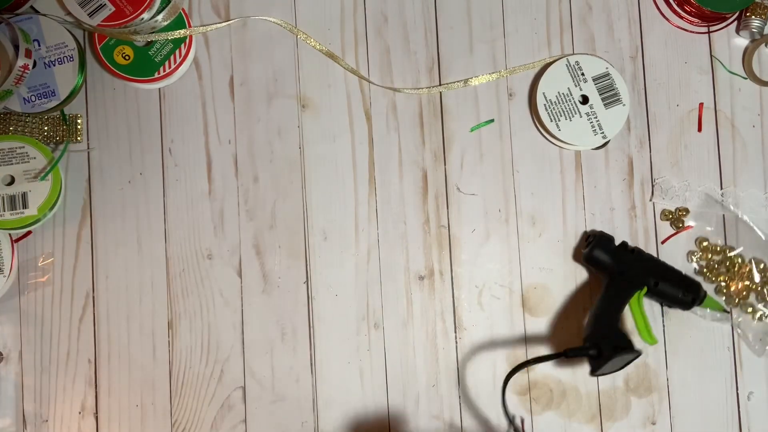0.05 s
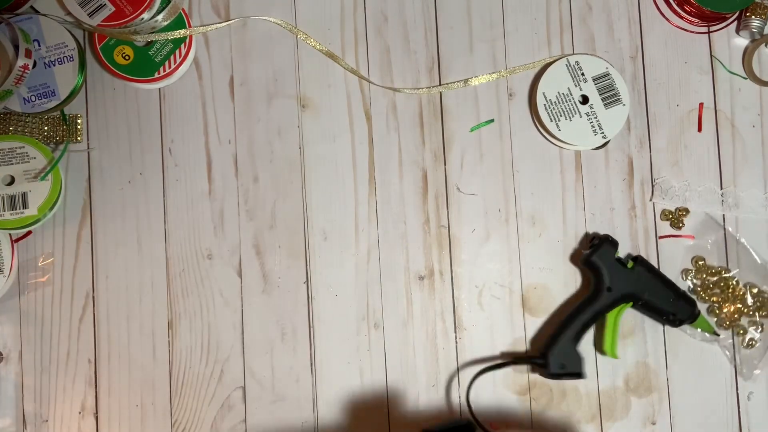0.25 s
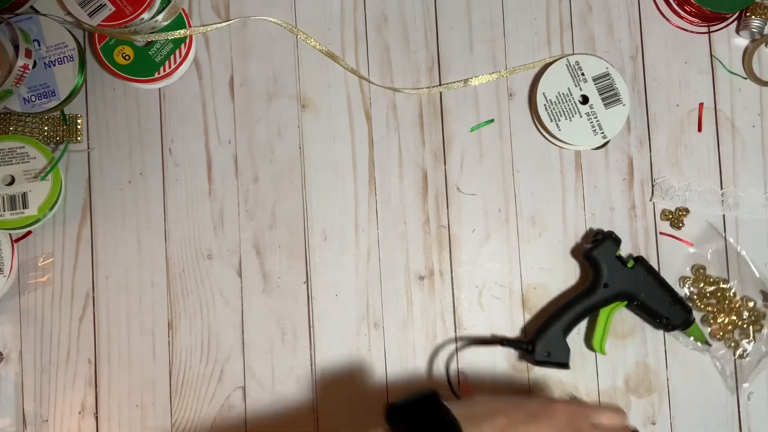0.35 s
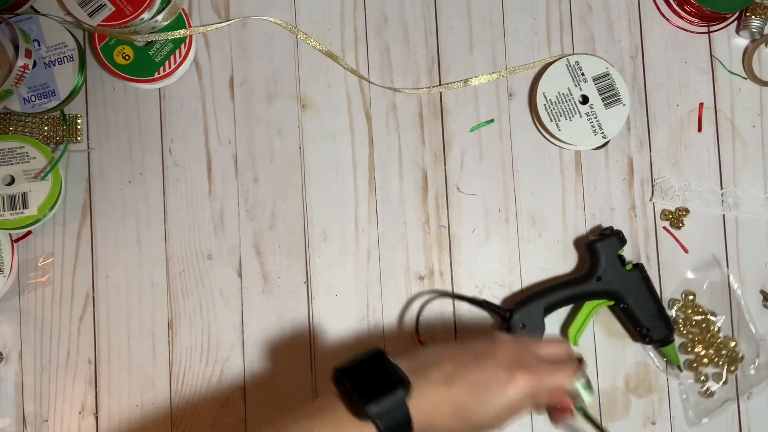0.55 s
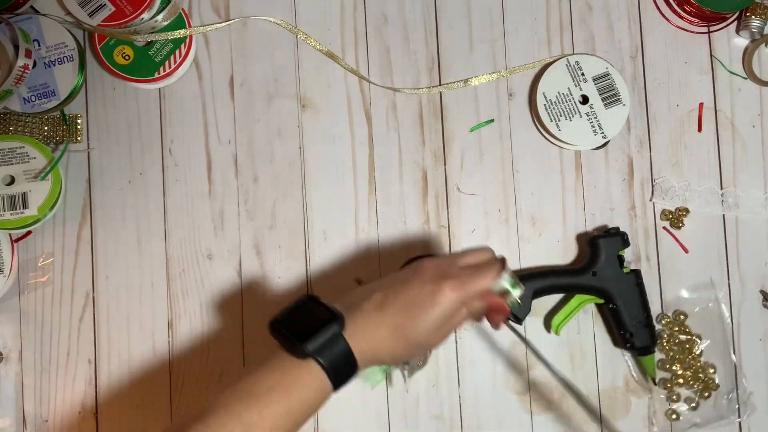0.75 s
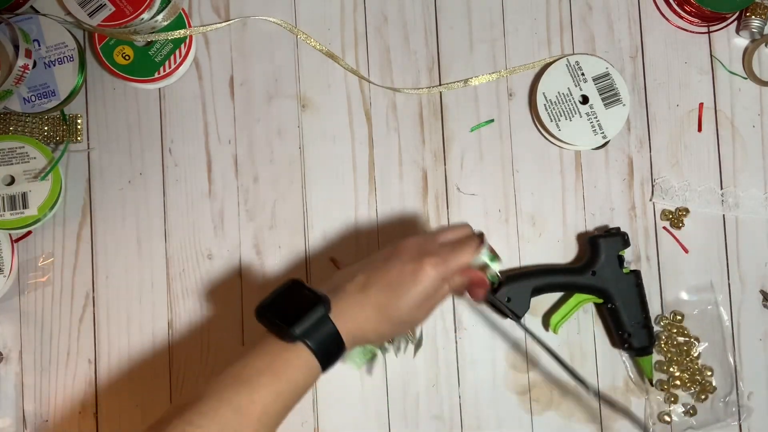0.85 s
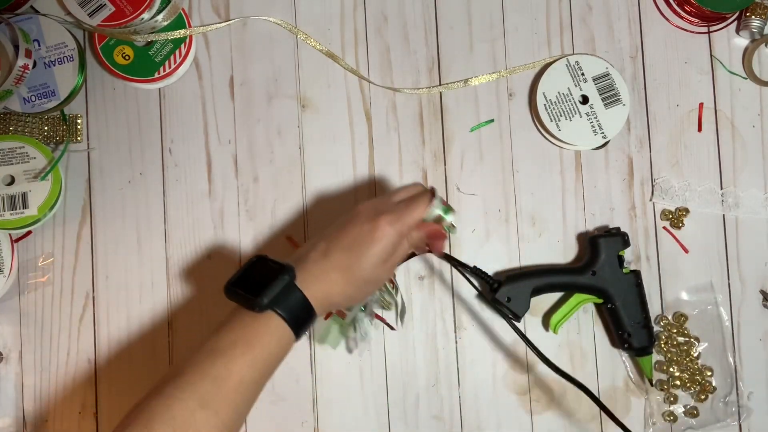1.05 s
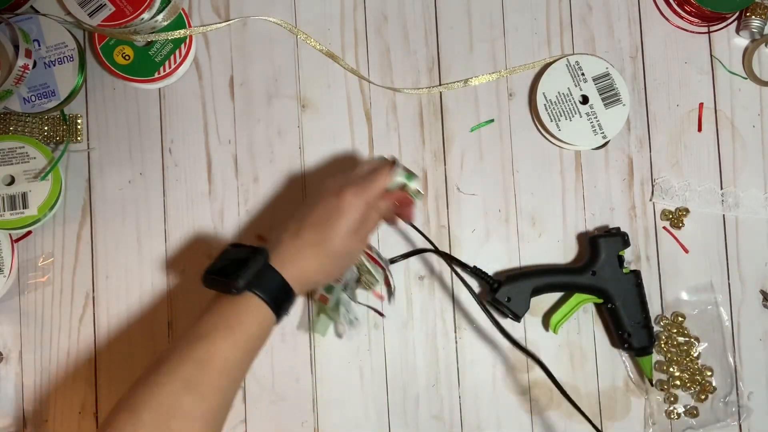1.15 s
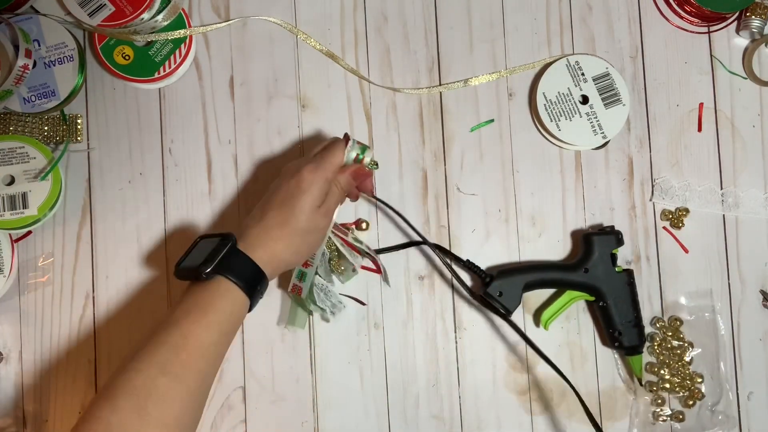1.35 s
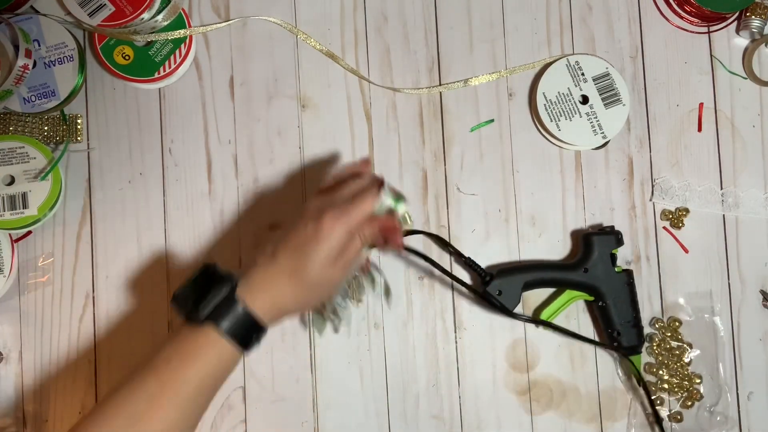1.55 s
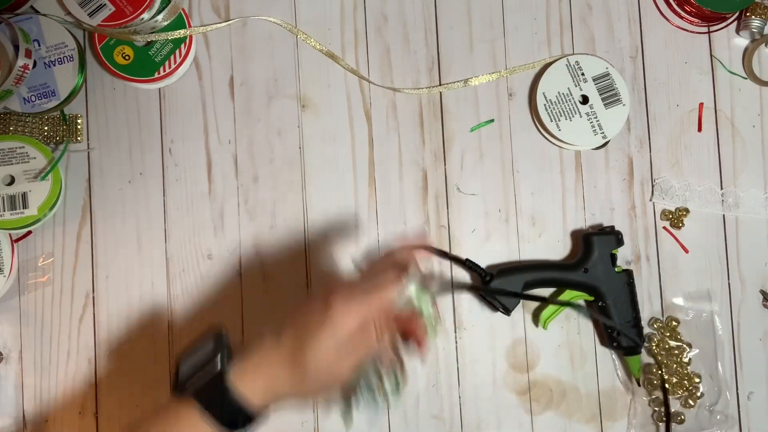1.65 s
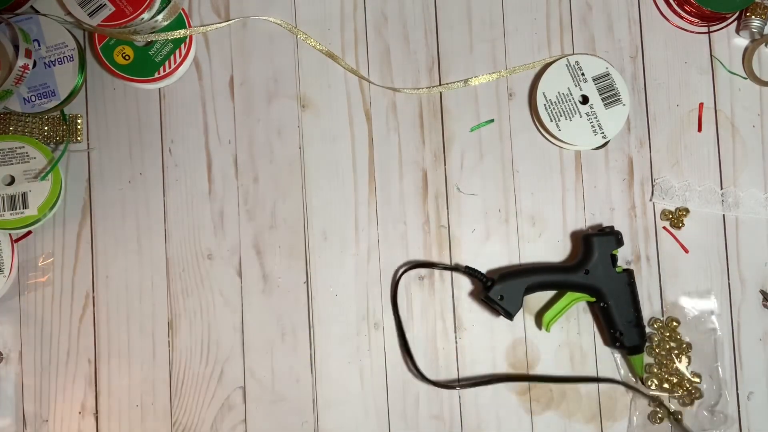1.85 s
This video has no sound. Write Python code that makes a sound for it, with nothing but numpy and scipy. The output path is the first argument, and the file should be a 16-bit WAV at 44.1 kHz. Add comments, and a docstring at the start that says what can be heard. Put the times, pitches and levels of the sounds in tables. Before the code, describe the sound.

Hollow plastic glue gun clacks down on a wood table, followed by cord clicks and faint jingling

```python
"""Glue gun and bell bag on a tabletop

A small plastic glue gun is set down on a wooden tabletop, slides and settles: noise bursts and clicks drive
its resonances. Its cord then flicks and drags over the table and against a bag of tiny metal bells: filtered
bursts, uneven grains and faint ringing modes. The table booms softly at each push, as a decaying low sine,
over a mains hum, a low rumble and room hiss. A pair of close microphone ports hears it."""
import sys
import numpy as np
from scipy import signal
from scipy.fft import rfft, irfft, next_fast_len
from scipy.io import wavfile

SR = 44100
rng = np.random.default_rng(int(sys.argv[2]) if len(sys.argv) > 2 else 0)


def wrap_up_sound(samples):
    """Save the sound to the file named by the first command line argument, as 16-bit audio."""
    columns = np.atleast_2d(samples).T
    # keep every value between -1 and 1, then stretch to whole-number steps
    tamed = np.clip(columns, -1, 1)
    steps = np.round(tamed * 32767).astype(np.int16)
    wavfile.write(sys.argv[1], SR, steps)


N = 83790


def from_db(db):
    """Amplitude gain of a level in dB."""
    return 10 ** (np.asarray(db) / 20)


def rms_one(x):
    """Scale to rms 1 over all channels together."""
    return x / np.sqrt(np.mean(x ** 2) + 1e-20)


def colour(x, points):
    """Equalise along (f/Hz, gain/dB) points, joined by straight lines over log frequency."""
    size = next_fast_len(N + 4096)
    hz = np.maximum(np.arange(size // 2 + 1) * SR / size, 1)
    points_hz, points_db = np.array(points).T
    gain = from_db(np.interp(np.log(hz), np.log(points_hz), points_db))
    return irfft(rfft(x, size) * gain, size)[..., :N]


def peak(x, hz, width_hz):
    """Two-pole resonance with about unit gain on top."""
    r = np.exp(-np.pi * width_hz / SR)
    return signal.lfilter([(1 - r * r) / 2, 0, (r * r - 1) / 2], [1, -2 * r * np.cos(2 * np.pi * hz / SR), r * r], x)


def strike(times, levels_db, modes, spread_db):
    """Mid and side ringing: every blow excites every mode with a random strength and a random side sign."""
    out = np.zeros((2, N))
    at = np.clip(np.array(times) * SR, 0, N - 1).astype(int)
    draws = rng.standard_normal((len(at), len(modes), 3))
    for k, (hz, db, t60) in enumerate(modes):
        clicks = np.full((2, N), 1e-18)   # tiny floor instead of exact silence
        clicks[:, at] = from_db(levels_db + db + spread_db * draws[:, k, :2].T)
        clicks[1, at] *= np.sign(draws[:, k, 2])
        r, w = from_db(-60 / (t60 * SR)), 2 * np.pi * hz / SR
        out += signal.lfilter([0, np.sin(w)], [1, -2 * r * np.cos(w), r * r], clicks)
    return out


TAP_RISE_S, SNAP_DB, SNAP_T60_S = .0008, 5, .01   # the snap level is against the rattle


def burst(t60):
    """Mid and side noise, a quarter second long: a sharp snap over a dying rattle."""
    t = np.arange(SR // 4) / SR
    noise = rng.standard_normal((2, SR // 4))
    rattle = from_db(-60 * t / t60)
    snap = from_db(SNAP_DB - 60 * t / SNAP_T60_S)
    return noise * (rattle + snap) * (1 - np.exp(-t / TAP_RISE_S))


def add(out, s, x):
    """Mix x into out from time s."""
    i = int(s * SR)
    out[:, i:i + x.shape[1]] += x[:, :N - i]


# tone of the room hiss: [f/Hz, gain/dB]
HISS_COLOUR = [(20, -19.5), (60, -5.5), (130, -14), (200, -26.5), (500, -44.5), (2500, -44), (5000, -39.5),
               (16000, -54.5)]
HISS_DB = -51
HUM_HZ, HUM_DB = 120.7, -49.5
RUMBLE_HZ, RUMBLE_WIDTH_HZ, RUMBLE_DB = 61.6, 4.7, -61


def background():
    """Broad room hiss, a narrow band of low noise as rumble, and mains hum as a steady sine."""
    hiss = from_db(HISS_DB) * rms_one(colour(rng.standard_normal((2, N)), HISS_COLOUR))
    rumble = rng.standard_normal((2, N + SR))
    for _ in range(2):
        rumble = peak(rumble, RUMBLE_HZ, RUMBLE_WIDTH_HZ)
    rumble = rumble[:, SR:]   # skip the build-up of the resonance
    hum = np.sqrt(2) * np.sin(2 * np.pi * HUM_HZ * np.arange(N) / SR)
    return hiss + from_db(RUMBLE_DB) * rms_one(rumble) + from_db(HUM_DB) * hum


# handling of cord and bag, also followed by the jingle: [t/s, middle level/dB, treble level/dB]
HANDLING = [(0, -40, -44), (0.148, -57.5, -54), (0.319, -37, -52), (.5, -50.5, -54.5), (.76, -68, -59.5),
            (.81, -90, -51), (.93, -50.5, -65), (1.03, -61, -60.5), (1.07, -78, -57), (1.151, -83, -62),
            (1.17, -65.5, -46.5), (1.3, -61, -59.5), (1.46, -66.5, -51), (1.56, -50, -36.5),
            (1.76, -46.5, -45), (1.9, -44.5, -45)]
# tone of the rustle: [f/Hz, gain/dB]
RUSTLE_COLOUR = [(120, -34), (280, -2), (700, -4.5), (2500, -8.5), (5000, -3.5), (8000, -11), (12000, -3.5),
                 (16000, -18.5)]
GRAINS_PER_S, GRAIN_SPREAD_DB = 800, 4


def rustle():
    """Cord and bag rub in dense uneven grains; the part below 3 kHz and the treble follow the handling."""
    s, middle_db, treble_db = np.transpose(HANDLING)
    t = np.arange(N) / SR
    sizes = from_db(GRAIN_SPREAD_DB * np.minimum(rng.exponential(1, N), 5))
    grains = sizes * (rng.random(N) < GRAINS_PER_S / SR)
    x = colour(rng.standard_normal((2, N)) * (.5 + grains), RUSTLE_COLOUR)
    treble = signal.sosfiltfilt(signal.butter(2, 3000, "high", fs=SR, output="sos"), x)
    middle = from_db(np.interp(t, s, middle_db)) * rms_one(x - treble)
    return middle + from_db(np.interp(t, s, treble_db)) * rms_one(treble)


# ringing modes of the bells, low to top: [f/Hz, level/dB, free t60/s]
BELL_MODES = [(4440, -8, .15), (4875, 0, .18), (5250, -3, .35)]
# clear strokes: [t/s, level/dB, share of the free t60, pitch ratio, top mode trim/dB, low mode trim/dB]
TINKLES = [(.724, -45, 1.0, 1.0, 0, 0), (.8515, -9.5, .14, .975, -16, -9), (.871, -18, .12, .975, -14, -8),
           (.886, -35, .5, .97, -10, 8)]
BELL_RISE_S = .003


def clear_bells():
    """Each stroke rings the bell modes with a soft onset, its own pitch ratio and its own damping."""
    out, t = np.zeros((2, N)), np.arange(N) / SR
    for s, db, share, ratio, top_db, low_db in TINKLES:
        modes = []
        for hz, mode_db, t60 in BELL_MODES:
            trim_db = top_db * (hz == BELL_MODES[-1][0]) + low_db * (hz == BELL_MODES[0][0])
            modes.append((hz * ratio, mode_db + trim_db, t60 * share))
        rise = 1 - np.exp(-np.maximum(t - s, 0) / BELL_RISE_S)
        out += strike([s], db, modes, 0.74) * rise
    return out


# modes that jingle at random as the bag is shaken: [f/Hz, level/dB, t60/s]
JINGLE_MODES = [(4850, -6, .07), (5400, -5, .06), (9920, -4, .06), (11200, -2, .07), (12500, -1, .06)]
JINGLES_PER_S, JINGLE_DB = 70, -9   # level against the treble of the handling


def jingle():
    """Small random blows ring the bells; their strength follows the treble of the handling."""
    times = np.flatnonzero(rng.random(N) < JINGLES_PER_S / SR) / SR
    s, _, treble_db = np.transpose(HANDLING)
    return strike(times, np.interp(times, s, treble_db) + JINGLE_DB, JINGLE_MODES, 6)


# snaps and taps of cord and bag: [t/s, relative level/dB, body f/Hz, relative treble level/dB, rattle t60/s]
TAPS = [(.078, -37.5, 2170, -11.5, 0.055), (0.168, -40.5, 1940, -2, 0.046),
        (0.428, -36.5, 5450, 3.5, 0.086), (0.823, -27.5, 6550, 10, 0.15), (0.844, -31, 1086, -23, 0.46),
        (0.851, -30.5, 536, -7, 0.13), (.861, -28.5, 1980, -12, 0.097), (1.16, -51, 5160, -22, 0.13),
        (1.291, -50.5, 3350, -13, 0.028), (1.363, -35, 3190, -27, 0.056), (1.481, -41, 422, -3, 0.22),
        (1.51, -21.5, 997, 2.5, 0.035), (1.513, -20.5, 2145, -15, 0.074), (1.524, -22, 1980, -16, 0.078),
        (1.55, -32.5, 3360, -3, 0.022), (1.616, -22, 3040, 3.5, 0.054), (1.666, -33.5, 3260, -6, 0.13),
        (1.693, -33, 2096, -4, 0.026), (1.723, -36.5, 2500, -28, 0.029), (1.731, -29.5, 4130, -38, 0.075),
        (1.795, -28, 2104, -12, 0.15), (1.804, -20.5, 2010, 1.5, 0.04), (1.8192, -21, 1980, -29, 0.083),
        (1.828, -29.5, 2300, 7.5, 0.08), (1.851, -27, 860, -2, 0.038)]
TAP_Q, TAP_BROAD_DB = 5, 2
TAP_RING_S, TAP_RING_DB = .003, 2   # time constant and relative level of the free ring


def taps():
    """The struck part rings freely for a moment; a noise burst adds a body resonance, broad middle and treble."""
    out = np.zeros((2, N))
    high = signal.butter(2, 7000, "high", fs=SR, output="sos")
    for s, db, hz, treble_db, t60 in TAPS:
        x = burst(t60)
        body = np.sqrt(TAP_Q * 2000 / hz) * peak(x, hz, hz / TAP_Q)   # makes up for the narrower low bands
        broad = from_db(TAP_BROAD_DB) * peak(x, 1100, 6000)
        treble = from_db(treble_db) * signal.sosfilt(high, x)
        t = np.arange(x.shape[1]) / SR
        ring = from_db(TAP_RING_DB) * np.exp(-t / TAP_RING_S) * np.sin(2 * np.pi * hz * t)
        ring = ring * [[1], [rng.choice([-1, 1])]]   # random side sign
        add(out, s, from_db(db - 2.0) * (body + broad + treble + ring))
    return out


# hand and cord bump the table: [t/s, relative level/dB]
BUMPS = [(0.428, -32), (1.163, -46), (1.369, -44), (1.477, -40), (1.783, -32)]
# low table resonances: [f/Hz, width of the first pass/Hz, relative level/dB]
BUMP_PEAKS = [(215, 45, 0.5), (306.4, 50, -2), (356, 103, -8)]
BUMP_T60_S = 0.25


def bumps():
    """Noise bursts, filtered twice by each low table resonance, make dull bumps."""
    out = np.zeros((2, N))
    for s, db in BUMPS:
        add(out, s, from_db(db + 20) * burst(BUMP_T60_S))
    return sum(from_db(db) * peak(peak(out, hz, width), hz, 2 * width) for hz, width, db in BUMP_PEAKS)


# soft pushes on the tabletop: [t/s, level/dB, hold/s]
PUSHES = [(-0.005, -17, 0.0033), (0.2255, -11, 0.025), (0.4153, -28.5, 0.051), (1.304, -35.5, 0.019),
          (1.374, -44, 0.031), (1.535, -41, 0.04), (1.742, -31.5, .032), (1.821, -31.5, 0.015)]
BOOM_HZ, BOOM_T60_S, BOOM_RISE_S = 103.5, 0.14, 0.0012


def table_boom():
    """The lowest mode of the tabletop, a sine, swells, holds and dies at each push."""
    out = np.zeros(N)
    for s, db, hold in PUSHES:
        t = np.maximum(np.arange(N) / SR - s, 0)
        decay = from_db(db - 60 * np.maximum(t - hold, 0) / BOOM_T60_S)
        out += decay * (1 - np.exp(-t / BOOM_RISE_S)) * np.sin(2 * np.pi * BOOM_HZ * t)
    return out * np.ones((2, 1))   # alike in mid and side


# the gun slides on the wood, silent outside these times: [t/s, level/dB]
SLIDE = [(.36, -48), (0.372, -31), (0.406, -34.5), (0.428, -44)]
# resonances of the slide: [f/Hz, width of the first pass/Hz, relative level/dB]
SLIDE_PEAKS = [(633.6, 300, 11), (1000, 900, 3.5)]


def gun_slide():
    """Sparse random slips of plastic on wood excite the slide resonances."""
    t = np.arange(N) / SR
    s, db = np.transpose(SLIDE)
    slips = rng.standard_normal((2, N)) * (rng.random(N) < 3000 / SR)   # about 3000 slips a second
    rub = sum(from_db(p_db) * peak(peak(slips, hz, width), hz, 2 * width) for hz, width, p_db in SLIDE_PEAKS)
    return rms_one(rub) * from_db(np.interp(t, s, db, left=-120, right=-120))


# the gun strikes the table: [t/s, relative level/dB, rattle t60/s]
KNOCKS = [(0.010, -35, 0.047), (0.212, -26.5, 0.33), (0.2214, -2.5, 0.013), (0.2239, -9.5, 0.12)]
# brief ring of the hollow shell: [f/Hz, relative level/dB, t60/s]
SHELL = [(863, -1, 0.026), (1817, 2, 0.016)]
# resonances of gun and tabletop: [f/Hz, relative level/dB]
BODY = [(160, 0.5), (312, 1), (400, -5.5), (550, -5), (738, -1.5), (840, 1.5), (1130, -1.5), (1215, 1),
        (1480, 1.5), (1740, -4), (1885, 1.5), (2030, -0.5), (2500, -7.5), (3150, -9)]
BODY_WIDTH_HZ, BODY_WIDENS = 24, 0.09   # width grows with pitch
CRACK_DB, CRACK_HZ = -16.5, 3700
CONTACT_DB = 10   # the hard first contact, a single click


def gun_knocks():
    """A hard contact and a rattle drive the body modes; the ringing shell and a broad crack sit on top."""
    out = np.zeros((2, N))
    for s, level_db, t60 in KNOCKS:
        x = burst(t60)
        contact = from_db(CONTACT_DB) * (np.arange(x.shape[1]) == 0) * [[1], [.5]]
        body = 0
        for k, (hz, db) in enumerate(BODY):
            drive = (-1) ** k * x + contact   # the rattle changes sign from mode to mode
            body = body + from_db(db + 11) * peak(drive, hz, BODY_WIDTH_HZ + BODY_WIDENS * hz)
        crack = from_db(CRACK_DB) * peak(x, CRACK_HZ, 4100)
        add(out, s, from_db(level_db) * (body + crack))
    times, levels_db = np.transpose(KNOCKS)[:2]
    return out + strike(times, levels_db, SHELL, 0.85)


ROOM_DB, ROOM_T60_S, ROOM_CUT_HZ = -14, 0.17, 1860


def room(x):
    """Dull reverberation: convolution with low-passed, dying noise that starts after 4 ms."""
    t = np.arange(SR // 2) / SR
    tail = rng.standard_normal((2, SR // 2)) * from_db(-60 * t / ROOM_T60_S) * (t > .004)
    tail = signal.sosfilt(signal.butter(1, ROOM_CUT_HZ, fs=SR, output="sos"), tail)
    tail = tail / np.sqrt(np.sum(tail ** 2) / 2)
    return from_db(ROOM_DB) * signal.fftconvolve(x, tail, axes=1)[:, :N]


# stereo balance by frequency, wide around 9 kHz, nearly mono in the deep bass and top treble:
# [f/Hz, side over mid/dB]
STEREO_BALANCE = [(60, -23), (190, -5.5), (400, -2.5), (3500, 0.5), (7700, 2), (8300, 16.5), (9500, 18.5),
                  (10200, 3.5), (13000, -19.5), (16000, -19)]
BASS_LEFT, BASS_LEFT_HZ = 0.12, 206   # share of the low-passed mid that leans left


def scene():
    """All sources as mid and side, shared out to left and right with this balance."""
    hits = gun_knocks() + gun_slide() + bumps() + taps() + clear_bells() + jingle()
    mid, side = hits + room(hits) + table_boom() + rustle() + background()
    # where the side leads, the mid is cut; elsewhere the side is cut
    mid = colour(mid, [(hz, -max(db, 0)) for hz, db in STEREO_BALANCE])
    side = colour(side, [(hz, min(db, 0)) for hz, db in STEREO_BALANCE])
    bass = signal.sosfilt(signal.butter(1, BASS_LEFT_HZ, fs=SR, output="sos"), mid)
    side = side + BASS_LEFT * bass
    return np.array([mid + side, mid - side])


CUTOFF_HZ = 16400


def record(dry):
    """Overload clips at full scale, a steep low-pass cuts the top, and the result is clipped again."""
    low_pass = signal.cheby2(14, 60, CUTOFF_HZ, fs=SR, output="sos")
    return np.clip(signal.sosfilt(low_pass, np.clip(dry, -1, 1)), -1, 1)


dry = scene()
out = record(dry)
wrap_up_sound(out)
```